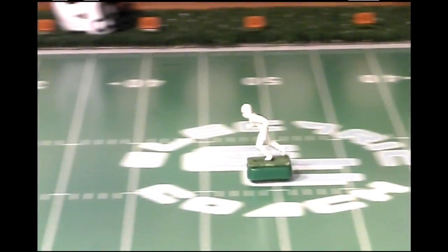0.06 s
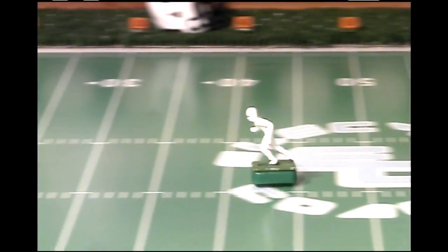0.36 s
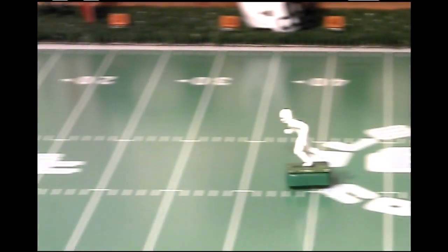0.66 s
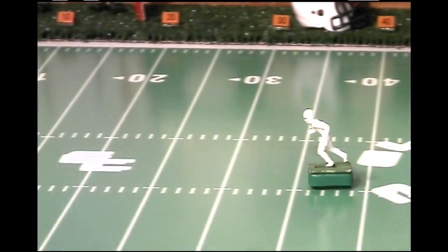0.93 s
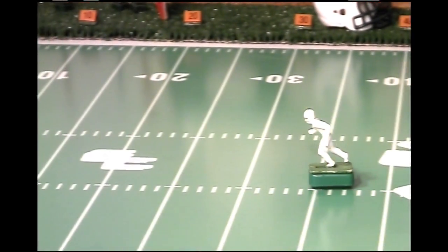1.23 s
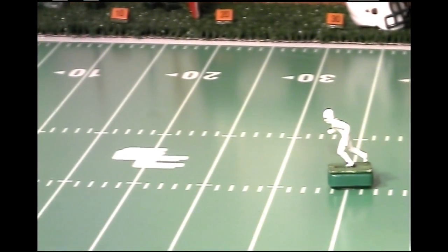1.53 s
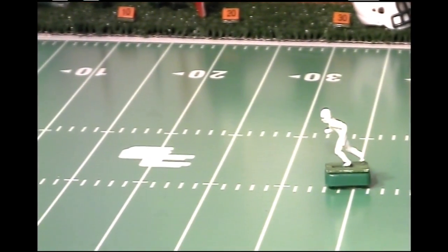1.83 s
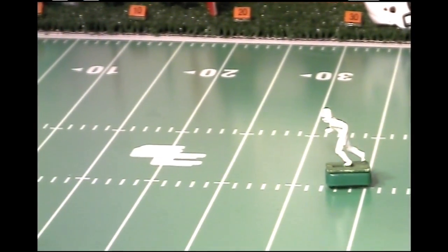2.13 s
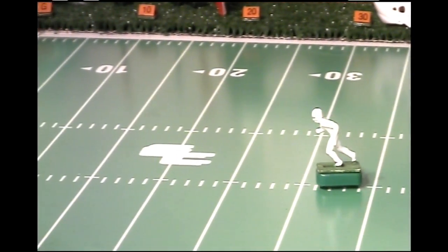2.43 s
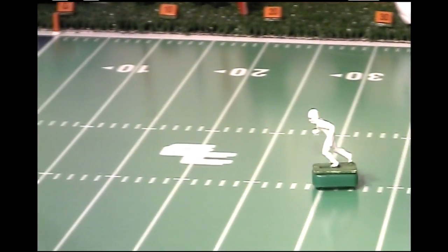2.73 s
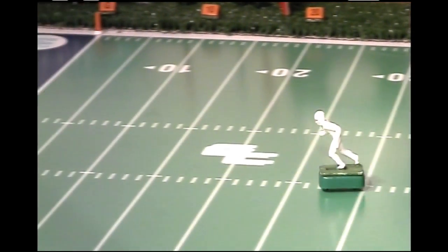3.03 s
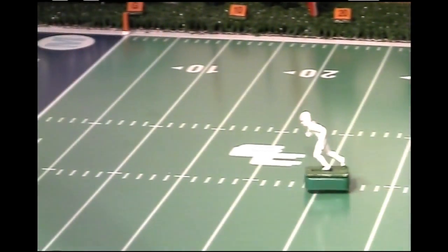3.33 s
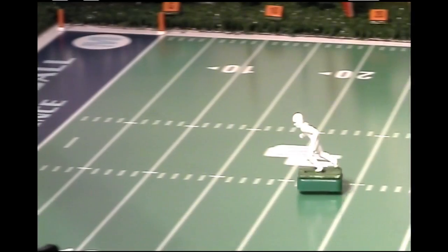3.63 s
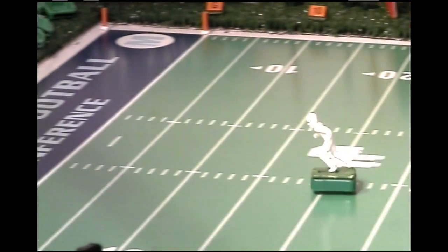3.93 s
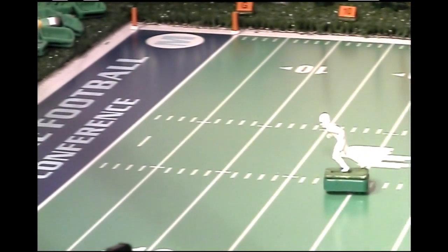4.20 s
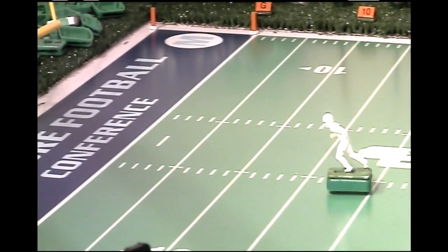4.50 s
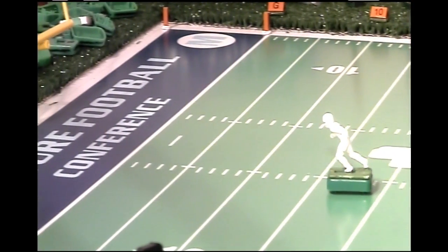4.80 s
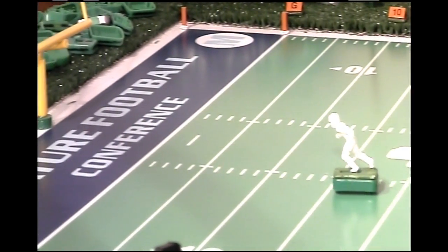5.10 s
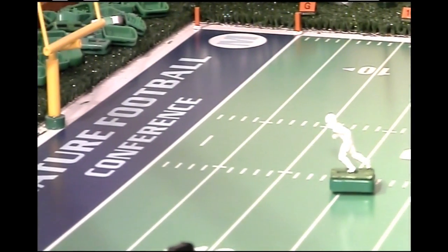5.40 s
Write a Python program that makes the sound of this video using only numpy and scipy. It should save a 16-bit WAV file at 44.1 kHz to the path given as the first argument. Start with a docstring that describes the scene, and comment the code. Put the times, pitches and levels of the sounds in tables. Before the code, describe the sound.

An electric football board buzzes on a table indoors, heard from close above, from the first instant to the end at about 5.5 seconds. The vibrator drives a thin metal sheet, making a bright, tinny drone with a fixed low pitch and many ringing overtones. The overall level stays nearly even, while the tone colour shifts slightly, mostly during the first second or two. A small plastic player creeps over the sheet throughout, its prongs making a light, high rasp that pulses four to five times a second with a faint throb. Loose contacts add a fine, gritty chatter on top, which grows a little harsher around 0.5 seconds, again near 2.7 and 4 seconds, and most clearly around 5 seconds. Underneath lie a faint electrical hum, a soft metallic wash and a thin, even fizz.

```python
"""On a table, an electric football board buzzes, heard from close above.
A mains vibrator slaps the metal sheet 120 times a second; the sheet rings in harmonics and chatters
at its loose contacts. A plastic figure creeps over it, rocking at nearly half the buzz rate, so its
prongs rasp in slow surges. Underneath lies a bed of faint hum, thin fizz and a metallic wash."""
import sys
import numpy as np
from scipy import signal
from scipy.fft import rfft, irfft, next_fast_len
from scipy.io import wavfile
from scipy.ndimage import map_coordinates

SR = 44100
rng = np.random.default_rng(int(sys.argv[2]) if len(sys.argv) > 2 else 0)


def put_to_file(sound):
    """Save the sound as 16-bit audio at rate SR, in the file named by the first command-line argument."""
    columns = np.atleast_2d(sound).T  # one column per channel
    safe = np.clip(columns, -1, 1)
    whole_steps = np.round(safe * 32767)
    wavfile.write(sys.argv[1], SR, whole_steps.astype(np.int16))


N = 244739
BUZZ_HZ = 119.983  # strokes a second, twice the mains

# colour of the sheet's diffuse ringing: f/Hz, level/dB per Hz before the trim
WASH_COLOUR = [(30, -107), (90, -116), (150, -88), (280, -82.5), (390, -76.5), (500, -84.5), (1000, -81),
               (1550, -75.5), (2100, -77.5), (2400, -75), (3600, -75.5), (4200, -81), (6500, -77),
               (9500, -57.5)]
# pace of the figure's rocking as it slips against the buzz: t/s, surge rate/Hz
SURGE_RATE = [(0, 4.128), (1.9, 4.779), (3.1, 4.151), (4.7, 4.773), (5.5, 3.941)]
# rocking tones just off odd mains harmonics: mains multiple, side (-1 below, +1 above), level/dB rms
ROCKING_TONES = [(3, -1, -66.5), (3, 1, -62), (5, -1, -67), (5, 1, -68.5), (9, 1, -67.5), (11, -1, -71),
                 (21, -1, -66)]
# colour of the prongs' rasp: f/Hz, relative level/dB
RASP_COLOUR = [(1500, -24), (3000, -10.5), (4100, -8.5), (4700, -2), (5700, 0.5), (6050, -1), (6350, -12),
               (7500, -3.5), (10000, -43)]
# contacts in every stroke: onset/cycles, f/Hz, half-width/Hz, relative level/dB, decay/cycles
CONTACTS = [(.16, 13900, 1300, 0, .08), (.18, 7600, 600, -3, .13), (.23, 3500, 500, -4, .08),
            (.53, 10200, 1400, -2, .09), (.54, 8200, 700, 3, .11), (.58, 3500, 500, -4, .09),
            (.72, 10400, 1000, -5, .08), (.78, 7800, 600, -3, .1)]
# slow spells of play in the contacts: t/s, looseness/dB
LOOSE_SPELLS = [(0.0, -1.0), (0.2, -5.0), (0.46, 8), (0.85, -1), (1.5, -10), (2.2, -3), (2.5, -9),
                (2.65, 4.0), (3.4, -8), (4.0, 2), (4.4, -4.0), (4.95, 10), (5.55, 2)]
# colour of the contacts' chatter: f/Hz, base level/dB per harmonic
CHATTER_COLOUR = [(3000, -64), (4200, -56), (5200, -56.5), (6400, -65), (7200, -46.5), (7600, -49),
                  (8150, -45), (8900, -72), (9600, -70), (10500, -63), (11800, -67), (12800, -69),
                  (13700, -59), (14800, -67.5)]
# body of the buzz, as the sheet radiates it: buzz multiple, mean level/dB rms
BUZZ_HARMONICS = [(1, -60), (2, -48.5), (3, -57.0), (4, -55.5), (5, -56.5), (6, -55), (7, -61), (8, -42),
                  (9, -48.0), (10, -61), (11, -60), (12, -62.5), (13, -56.5), (14, -61.5), (15, -55.5),
                  (16, -51.5), (17, -49.0), (18, -55.5), (19, -57), (20, -50), (21, -46.5), (22, -52.5),
                  (23, -55), (24, -58), (25, -42.0), (26, -49), (27, -53), (28, -46.5), (29, -49),
                  (30, -47.5), (31, -46.5), (32, -59), (33, -43), (34, -59.5), (35, -61), (36, -44),
                  (37, -47.5), (38, -54.5), (39, -50), (40, -67), (41, -48), (42, -51.5), (43, -48),
                  (44, -47), (45, -49.5), (46, -58), (47, -48), (48, -52), (49, -50), (50, -50.5),
                  (51, -73), (52, -67), (53, -49.5), (54, -54.5), (55, -52), (56, -47), (57, -51.5),
                  (58, -44.5), (59, -55), (60, -63), (61, -45.5), (62, -45.5), (63, -50.5), (64, -38),
                  (65, -44.5), (66, -52.5), (67, -38), (68, -48), (69, -41), (70, -45.0), (71, -56),
                  (72, -45)]
# its weaker top end: f/Hz, mean level/dB per harmonic
BUZZ_TREBLE = [(8800, -77), (9500, -66.5), (10400, -56), (11400, -61), (12100, -58), (12800, -68),
               (13600, -66), (14400, -63), (15200, -79)]
# sheet resonances that swell or fade as the listener leaves midfield with the figure:
# f/Hz, half-width/Hz, change/dB, settling time/s
RESONANCES = [(3020, 110, 8.5, 0.8), (4100, 320, -8.5, 7.5), (5160, 190, -6, 0.58), (6900, 220, -4, 0.8),
              (7660, 120, 0, 0.73), (8340, 310, 5, 2.5), (11600, 180, 0, .8)]


def from_db(db):
    """Decibels to gain."""
    return 10 ** (np.asarray(db) / 20)


def at_hz(points, hz):
    """Read an EQ curve on a log-frequency axis."""
    f, level = np.transpose(points)
    return np.interp(np.log(np.maximum(hz, 1)), np.log(f), level)


def band(hz, centre, half_width):
    """A flat-topped bell, 1 at its centre."""
    return 1 / (1 + ((hz - centre) / half_width) ** 4)


def coloured(x, spectrum):
    """EQ white noise of rms 1 to a spectrum in dB per Hz."""
    size = next_fast_len(N)
    hz = np.fft.rfftfreq(size, 1 / SR)
    return irfft(rfft(x, size) * from_db(at_hz(spectrum, hz)) * np.sqrt(SR / 2), size)[:N]


def drift(shape, rate_hz):
    """Smooth complex random modulation of power 1, one row a stroke."""
    hz = np.fft.fftfreq(shape[0], 1 / BUZZ_HZ)[:, None]
    white = rng.standard_normal(shape) + 1j * rng.standard_normal(shape)
    slow = np.fft.ifft(white / (1 + (hz / rate_hz) ** 2), axis=0)
    return slow / np.sqrt(np.mean(abs(slow) ** 2))


def linger(x, memory):
    """Each stroke takes after the last, or opposes it if memory is negative; the power stays."""
    return signal.lfilter([np.sqrt(1 - memory ** 2)], [1, -memory], x, axis=-2)


def play_strokes(harmonics, t, size=4096):
    """Play one wavetable a stroke at the buzz rate, each crossfading into the next."""
    waves = irfft(np.pad(harmonics, ((0, 0), (1, 0))), size) * size / np.sqrt(2)
    waves = np.hstack([waves, waves[:, :1]])
    cycles = t * BUZZ_HZ
    return map_coordinates(waves, [cycles, cycles % 1 * size], order=1, mode="nearest")


def coil_hum(t, level_db=-84):
    """The coil hums faintly at the mains pitch, an octave under the buzz."""
    return np.sqrt(2) * from_db(level_db) * np.sin(np.pi * BUZZ_HZ * t)


def fizz(level_db=-49):
    """The highest modes and the room lay a thin, even fizz between the ticks."""
    air = coloured(rng.standard_normal(N), [(6000, -25), (10000, 9), (11500, 11), (14500, -7), (15500, -14)])
    return from_db(level_db) * air / np.std(air)


def sheet_wash(trim_db=-0.5, ripple_db=3.0, spacing_hz=25, count=900):
    """Irregular knocks keep the sheet's close modes ringing unevenly; the highest die at once."""
    size = next_fast_len(N)
    hz = np.fft.rfftfreq(size, 1 / SR)
    modes = from_db(np.interp(hz, spacing_hz * np.arange(count), ripple_db * rng.standard_normal(count)))
    damping = 1 / (1 + (hz / 7000) ** 8)
    ringing = irfft(rfft(rng.standard_normal(size)) * modes * damping, size)[:N]
    return from_db(trim_db) * coloured(ringing, WASH_COLOUR)


def surge_count(t, first_s=.068):
    """The figure's surges gone by: a whole number at the crest of each."""
    grid = np.arange(-SR, N + SR, 100) / SR
    turns = np.cumsum(np.interp(grid, *np.transpose(SURGE_RATE))) * (grid[1] - grid[0])
    return np.interp(t, grid, turns) - np.interp(first_s, grid, turns)


def figure_rocking(t, lag_s=0.043):
    """The rocking slips against the buzz by one beat per surge, so its low tones throb."""
    beats = surge_count(t - lag_s)
    tones = [from_db(db) * np.sin(np.pi * (multiple * BUZZ_HZ * t + side * beats))
             for multiple, side, db in ROCKING_TONES]
    return np.sqrt(2) * sum(tones)


def prong_rasp(t, rest_db=-48, surge_db=-39.5, spread_db=0.5, half_length_s=0.056, depth=0.96):
    """The figure's prongs bounce three times a stroke and rasp harder at each surge."""
    turns = surge_count(t)
    nearest = np.round(turns).astype(int)
    from_crest_s = (turns - nearest) / np.interp(t, *np.transpose(SURGE_RATE))
    crest_db = surge_db - spread_db * rng.standard_normal(nearest.max() + 1)
    surges = from_db(crest_db[nearest]) * np.exp(-(from_crest_s / half_length_s) ** 2)
    bounces = 1 + depth * np.cos(2 * np.pi * 3 * (BUZZ_HZ * t - .1))
    rasp = coloured(rng.standard_normal(N) * bounces, RASP_COLOUR)
    return (from_db(rest_db) + surges) * rasp / np.std(rasp)


def looseness(when, rocking_db=0.3, lead_s=0.098, flutter_db=1.5):
    """Play in the contacts, in dB: slow spells, a lift ahead of each surge and a random flutter."""
    rocked = np.cos(2 * np.pi * surge_count(when + lead_s))
    flutter = np.sqrt(2) * drift((len(when), 1), rate_hz=8.1).real[:, 0]
    return np.interp(when, *np.transpose(LOOSE_SPELLS)) + rocking_db * rocked + flutter_db * flutter


def contact_ticks(hz, count, tail_db, body_db, size=512):
    """Harmonics of count strokes, by contact: each rings briefly in its own band."""
    cycle = np.arange(size) / size
    envelopes = [np.exp(-((cycle - onset) % 1) / decay) + from_db(tail_db) for onset, *_, decay in CONTACTS]
    gains = [from_db(db) * band(hz, centre, width) for _, centre, width, db, _ in CONTACTS]
    # one more layer: the sheet's long ring
    envelopes.append(np.ones(size))
    gains.append(from_db(body_db) / (1 + hz / 4000))
    ticks, power = [], 0
    for gain, envelope in zip(gains, envelopes):
        burst = rng.standard_normal((count, size)) * envelope
        ticks.append(gain * rfft(burst)[:, 1:len(hz) + 1])
        power += gain ** 2 * np.sum(envelope ** 2)
    return np.array(ticks) / np.sqrt(power)


def contact_chatter(hz, loose_db, alternation=0.91, trim_db=-1, low_cut_hz=3200):
    """The hard, bright contacts grate most when loose, the grit alternating from stroke to stroke."""
    ticks = contact_ticks(hz, len(loose_db), tail_db=-26, body_db=-22).sum(axis=0)
    sensitivity = np.interp(hz, [3500, 7500, 11000, 13000], [.2, .6, .6, .2])
    level_db = at_hz(CHATTER_COLOUR, hz) + trim_db + loose_db * sensitivity
    return linger(ticks, -alternation) * from_db(level_db) / (1 + (low_cut_hz / hz) ** 4)


def sheet_ring(hz, loose_db, slip_s=5e-6, force_swing=0.074, wander=0.68):
    """Every stroke rings the same harmonics, each of mean power 1; loose landings roughen them."""
    strokes = len(loose_db)
    play = from_db(loose_db / 2)
    # timing slips of microseconds blur the high harmonics and leave the low ones pure
    ticks = contact_ticks(hz, count=1, tail_db=-28, body_db=-19)
    slip = slip_s * play * linger(rng.standard_normal((len(ticks), strokes, 1)), memory=.35)
    landed = (ticks * np.exp(-2j * np.pi * hz * slip)).sum(axis=0)
    ring = np.exp(1j * np.angle(landed))
    # the loosest contact, near 8 kHz, follows a hard landing with a soft one
    force = force_swing * play * np.diff(rng.standard_normal((strokes + 1, 1)), axis=0)
    ring *= 1 + force * band(hz, 8000, 900)
    # moving over the sheet shifts the balance of the short waves most
    moving = drift(ring.shape, rate_hz=0.2)
    ring *= 1 + wander * hz / (hz + 5000) * (moving - moving.mean(axis=0))
    return ring / np.sqrt(np.mean(abs(ring) ** 2, axis=0))


def sheet_buzz(t, scatter_db=3.5, count=128):
    """The vibrator slaps the sheet: a pitched ring with shifting resonances, and chatter on top."""
    hz = BUZZ_HZ * np.arange(1, count + 1)
    when = np.arange(int(t[-1] * BUZZ_HZ) + 2) / BUZZ_HZ
    level_db = at_hz(BUZZ_TREBLE, hz) + scatter_db * rng.standard_normal(count)
    level_db[:len(BUZZ_HARMONICS)] = np.array(BUZZ_HARMONICS)[:, 1]
    for centre, width, change_db, settling_s in RESONANCES:
        settled = 1 - np.exp(-when[:, None] / settling_s)
        level_db = level_db + change_db * (settled - settled.mean()) * band(hz, centre, width)
    loose_db = looseness(when)[:, None]
    ring = from_db(level_db) * sheet_ring(hz, loose_db)
    return play_strokes(ring + contact_chatter(hz, loose_db), t)


def scene():
    """The whole board sits dead centre."""
    t = np.arange(N) / SR
    board = sheet_buzz(t) + sheet_wash() + prong_rasp(t) + figure_rocking(t) + coil_hum(t) + fizz()
    return np.array([board, board])


def record(dry):
    """A steep high cut at 15.1 kHz."""
    return signal.sosfilt(signal.ellip(8, .2, 80, 15100, fs=SR, output="sos"), dry)


dry = scene()
out = record(dry)
put_to_file(out)
```